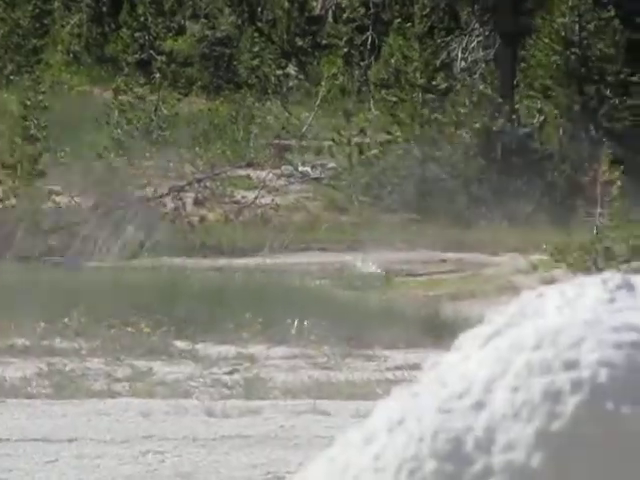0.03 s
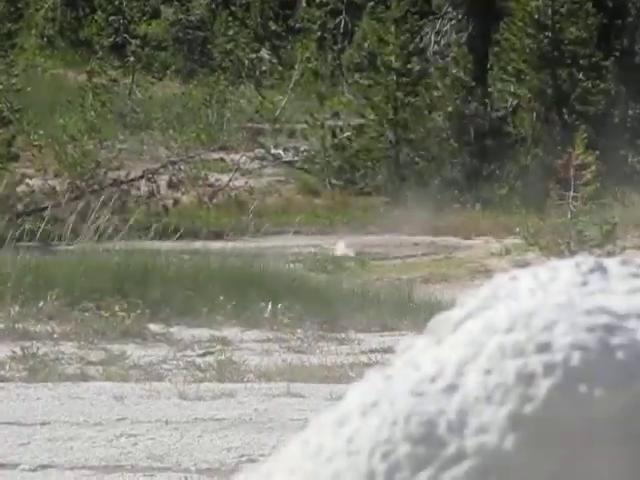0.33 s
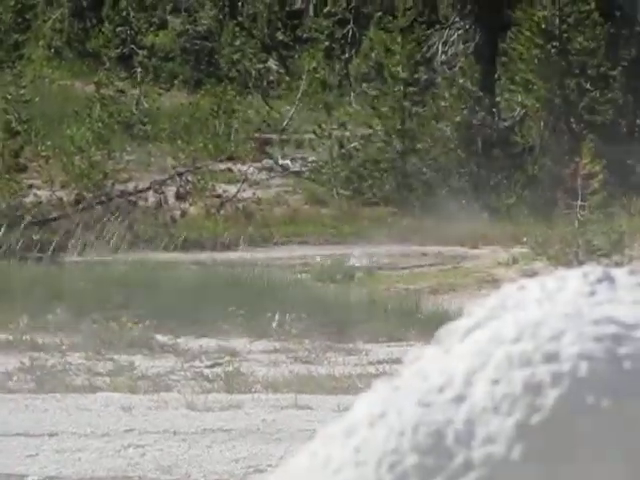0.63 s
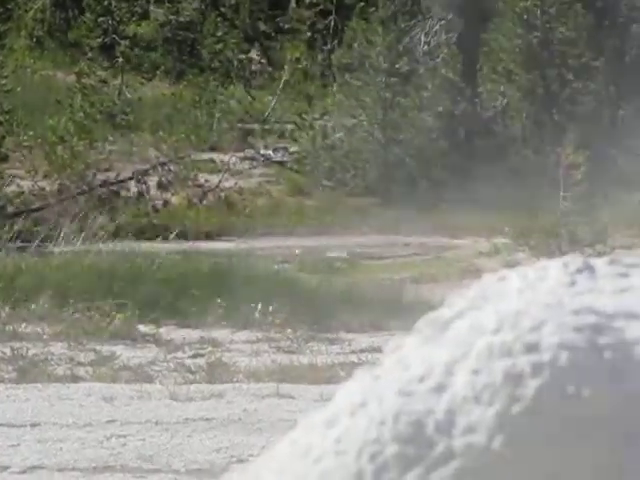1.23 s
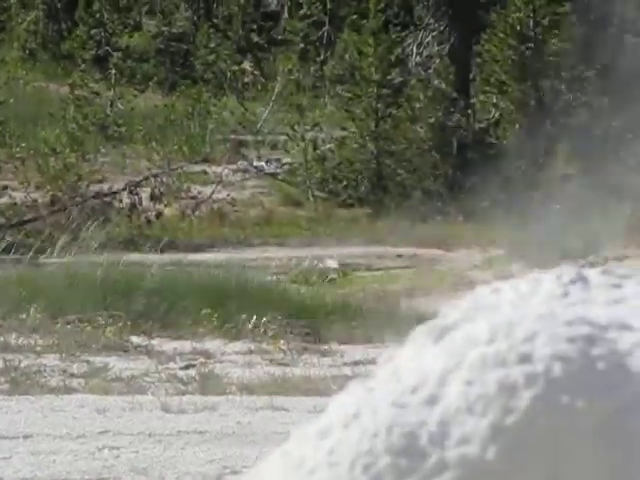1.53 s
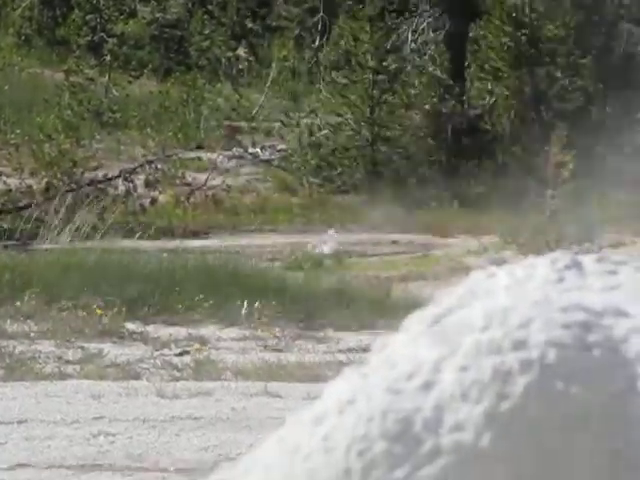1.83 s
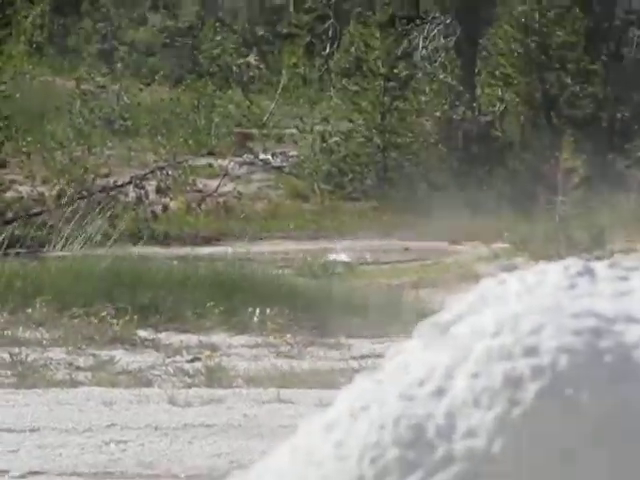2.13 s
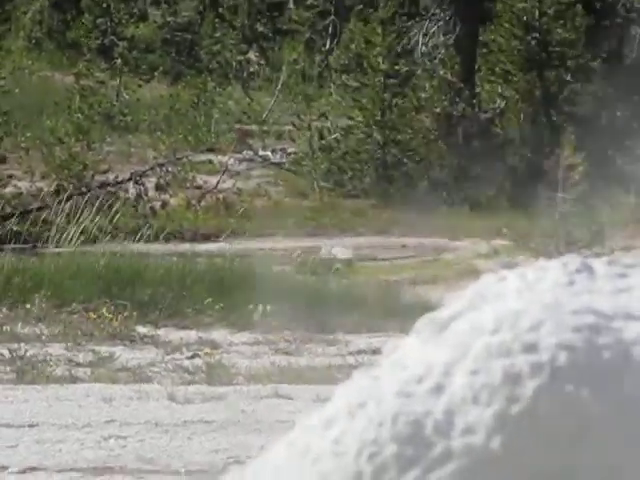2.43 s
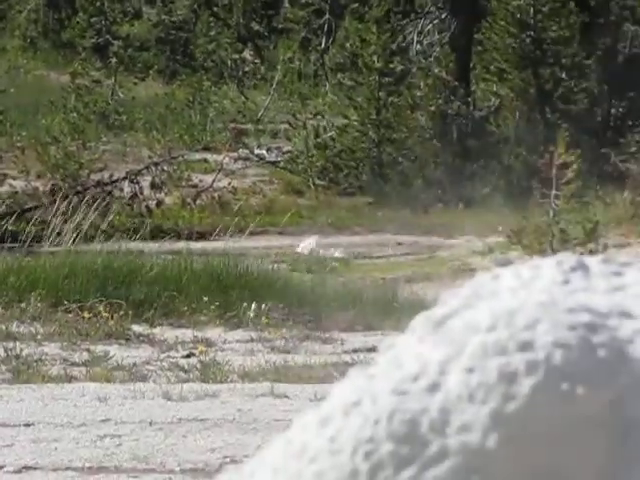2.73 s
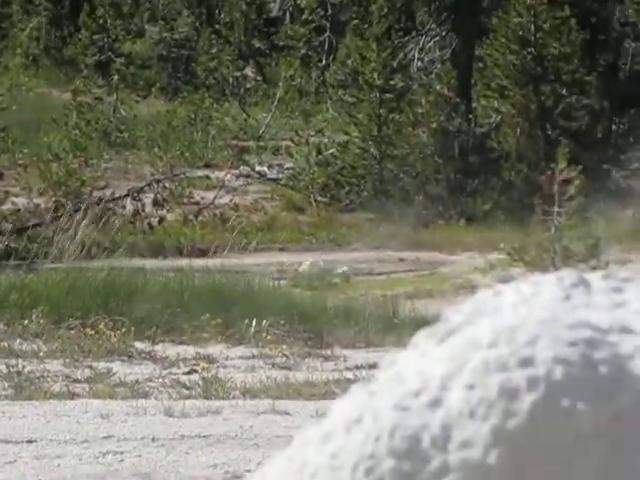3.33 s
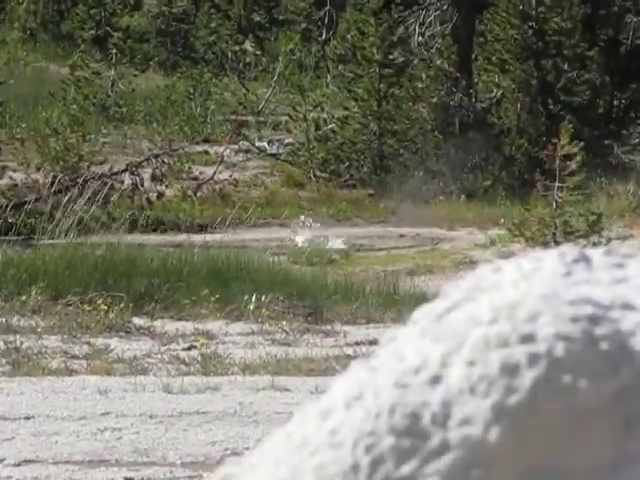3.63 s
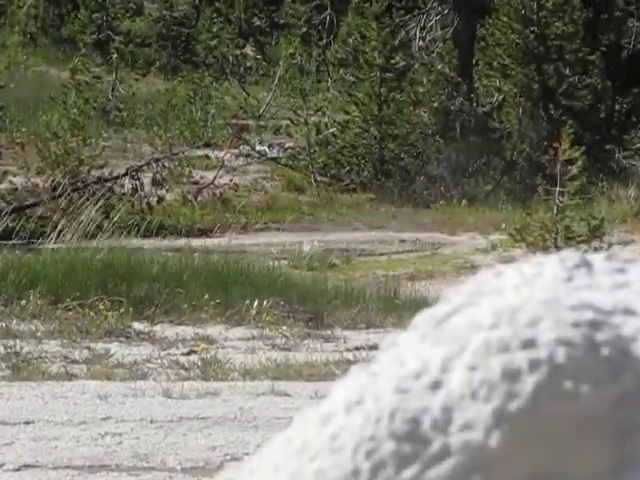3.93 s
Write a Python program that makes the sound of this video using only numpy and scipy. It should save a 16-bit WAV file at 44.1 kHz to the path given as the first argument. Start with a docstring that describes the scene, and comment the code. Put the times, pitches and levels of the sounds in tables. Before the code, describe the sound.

Steam rushes steadily from geyser vents at a forest edge. A gust buffets the microphone with a lumpy low rumble, then drops away, leaving the steam, a few faint water spits and a light breeze in the trees.

```python
"""A steady rush of steam from the vents of a geyser basin at the edge of a forest.
A fine hiss of spray flutters from the right. Hot water thumps softly in a vent and spits now and then,
with a few short, bright pings on top. A gust buffets the two microphone ports with a lumpy
rumble and the knocks of single eddies, then drops while the wind swells in the trees."""
import sys
import numpy as np
from scipy import signal
from scipy.fft import rfft, irfft
from scipy.io import wavfile
from scipy.ndimage import uniform_filter1d

SR = 44100
rng = np.random.default_rng(int(sys.argv[2]) if len(sys.argv) > 2 else 0)


def waveform_to_disk(signal):
    """Save audio, clipped to [-1, 1], as 16-bit WAV at the path in sys.argv[1]."""
    frames = np.transpose(np.atleast_2d(signal))
    scaled = np.clip(frames, -1, 1) * 32767
    samples = np.round(scaled).astype(np.int16)
    wavfile.write(sys.argv[1], SR, samples)


N = 176400
T = np.arange(N) / SR

# Tone of the wind in the trees. Each row: frequency in Hz, relative level in dB.
TREES_TONE = [(300, -20), (1200, 7.5), (3200, -3.5), (5000, -10.5), (7500, -17), (10000, -28.5),
              (15000, -42)]
# Its swell. Each row: time in seconds, level in dB.
TREES_FADER = [(0, -76), (2.2, -61), (2.9, -50.5), (3.3, -47), (3.7, -44), (4, -43.5)]
# Tone of the spray. Each row: frequency in Hz, relative level in dB.
SPRAY_TONE = [(1000, -24), (3200, 0.5), (5000, -1), (7500, -5), (10000, -14), (15000, -25)]
# Its surges and fade. Each row: time in seconds, level in dB.
SPRAY_FADER = [(0, -59.5), (.22, -55.5), (.38, -59.5), (.6, -60), (.85, -59), (1.15, -56.5), (1.32, -60),
               (1.42, -56.5), (1.55, -59.5), (1.74, -56.5), (1.9, -62.5), (2.2, -58.5), (2.7, -66),
               (4, -71)]

# Short bright pings. Each row: peak time in seconds, pitch in Hz, half length in seconds,
# peak level in dB, left minus right in dB.
PING_CUES = [(.6778, 2780, .0019, -30.5, -10), (.677, 7250, .0008, -44, -6), (2.395, 3350, .005, -40, -3),
             (2.456, 3400, .004, -43, -3), (3.565, 3350, .004, -38, -3)]
# Thumps in the vent. Each row: peak time in seconds, pitch in Hz, half length in seconds, peak in dB.
VENT_THUMPS = [(3.062, 178, 0.0029, -26), (3.819, 190, 0.005, -27.5)]
# Spits of water. Each row: peak time in seconds, half length in seconds, level in dB, centre in Hz.
SPIT_CUES = [(.21, .012, -57.5, 5500), (0.453, 0.0095, -36.5, 1100), (0.608, .012, -50, 3000),
             (2.0, .008, -59, 5500), (2.2, .008, -59, 5500), (2.391, 0.011, -39, 1590),
             (3.141, 0.0026, -30.5, 750), (3.145, .005, -41, 1900), (3.367, 0.014, -60, 6000),
             (3.527, .005, -56, 5000), (3.568, 0.0085, -38.5, 1590)]
# Tone of one spit. Each row: multiple of its centre frequency, relative level in dB.
SPIT_TONE = [(.2, -40), (.6, 0.5), (1, 5), (1.7, -7.5), (3, -28.5), (8, -50)]

# The gust's ride. Each row: time in seconds, level at the left port in dB, at the right port in dB.
GUST_FADER = [(0, -20.5, -33), (.1, -25.5, -28), (.2, -19.5, -20.5), (.34, -23.5, -27), (.48, -17, -19.5),
              (.55, -24.5, -23), (.68, -19.5, -30.5), (.77, -17, -24), (.85, -24, -25), (.97, -18, -21.5),
              (1.17, -13, -22), (1.25, -21, -23), (1.38, -21.5, -23.5), (1.45, -25.5, -22),
              (1.54, -28, -25), (1.72, -24, -25.5), (1.88, -30, -39), (2.02, -29.5, -32), (2.1, -35.5, -34),
              (2.18, -40, -44), (2.35, -48, -39), (2.47, -31.5, -39), (2.68, -45, -38.5), (2.8, -49, -38),
              (3.08, -51, -54), (3.35, -55, -46), (4, -53, -62)]
# Tone of its rumble. Each row: frequency in Hz, relative level in dB on the left, then on the right.
GUST_TONE = [(5, -26, -35), (15, -13, 4.5), (28.2, -6, 4.5), (50, 3, 6), (79.6, 0.5, -0.5), (130, -4.5, -6),
             (190, -13.5, -14), (285, -17.5, -20.5), (403, -30, -37.5), (700, -47, -44), (2000, -91, -85)]
# Eddies that strike a port. Each row: peak time in seconds, half length in seconds, level in dB,
# port (0 left, 1 right), centre in Hz.
EDDY_HITS = [(.034, 0.017, -15, 0, 102), (0.059, 0.01, -19, 0, 107), (.22, 0.04, -18.5, 0, 65),
             (.4, 0.009, -14.5, 0, 50), (.44, 0.012, -15, 0, 80), (.475, 0.026, -15.5, 1, 55),
             (.51, 0.0062, -19, 0, 55.5), (.592, 0.021, -17, 1, 45), (0.701, 0.012, -16.5, 0, 70),
             (0.902, 0.0064, -10.5, 0, 95), (0.928, .014, -20.5, 0, 202), (1.005, .014, -20, 1, 75),
             (1.009, 0.015, -14.5, 0, 118), (1.073, 0.0069, -15, 1, 55), (1.123, 0.018, -9.5, 0, 85),
             (1.194, 0.0091, -9.5, 0, 113), (1.23, 0.0064, -10.5, 1, 70), (1.294, 0.0061, -8.5, 0, 86),
             (1.385, 0.0093, -18, 1, 54.5), (1.601, 0.012, -14, 1, 45), (1.647, .011, -12.5, 0, 102),
             (2.405, 0.013, -28.5, 0, 45), (2.965, 0.012, -32, 1, 69.6), (3.16, 0.036, -34.5, 1, 68.6)]
# Tone of one eddy. Each row: multiple of its centre frequency, relative level in dB.
EDDY_TONE = [(.1, -30), (.55, -1.5), (1, -2.5), (1.5, -9.5), (2.6, -18.5), (4, -33.5), (8, -52), (25, -92)]

# Tone of the steam. Each row: frequency in Hz, relative level in dB.
STEAM_TONE = [(20, 1), (70, 3), (140, 3), (230, 2.5), (340, 1), (500, -1.5), (680, 2), (950, -1.5),
              (1400, -3), (1800, -6.5), (2500, -13), (3100, -15.5), (4200, -27), (6000, -34.5),
              (8000, -34.5), (15000, -45.5)]
# Its width, narrow lows to wide highs. Each row: frequency in Hz, left-right correlation.
STEAM_LIKENESS = [(30, 0.79), (190, 1), (700, .92), (1150, 0.74), (1650, 0.69), (2100, 0.42),
                  (2600, -0.0069), (3300, 0.37), (4500, 0.033), (15000, -0.037)]
# Its lean. Each row: frequency in Hz, left minus right in dB.
STEAM_BALANCE = [(100, -1.5), (700, -0.5), (1400, -1.5), (2700, -3), (4500, 4), (8000, 0)]


def amp(db):
    """Decibels to gain."""
    return 10 ** (np.asarray(db) / 20)


def unit(x):
    """Scales to rms 1."""
    return x / np.sqrt(np.mean(x ** 2) + 1e-20)


def at_hz(points, hz):
    """Reads a table on a log-frequency axis."""
    f, value = np.transpose(points)
    return np.interp(np.log(hz + 1), np.log(f + 1), value)


def at_time(points):
    """Reads a fader table at every sample."""
    return np.interp(T, *np.transpose(points))


def colour(x, tone):
    """Equalises a signal with a tone curve."""
    return irfft(rfft(x) * amp(at_hz(tone, np.fft.rfftfreq(N, 1 / SR))), N)


def wander(rate_hz):
    """A smooth random wobble of rms 1."""
    lowpass = np.exp(-(np.fft.rfftfreq(N, 1 / SR) / rate_hz) ** 2)
    return unit(irfft(rfft(rng.standard_normal(N)) * lowpass, N))


def rumble(tone):
    """Coloured noise, held near rms 1 from moment to moment."""
    noise = colour(rng.standard_normal(N), tone)
    power = uniform_filter1d(uniform_filter1d(unit(noise) ** 2, size=1100), size=700)
    return noise / np.sqrt(power + 1e-6) / np.std(noise)


def turbulence(tone, likeness, balance, left_lag_s, patchy_db, flicker_db, size=1024):
    """A stereo noise bed of rms 1, with drifting patches and a flicker shared by all bands."""
    frames, hz = N // (size // 4) + 5, np.fft.rfftfreq(size, 1 / SR)
    left_re, left_im, side_re, side_im, patches = rng.standard_normal((5, frames, len(hz)))
    patches = unit(uniform_filter1d(uniform_filter1d(patches, size=8, axis=0), size=16, axis=1))
    flicker = unit(uniform_filter1d(rng.standard_normal(frames), size=4))[:, None]
    shared = np.clip(at_hz(likeness, hz), -1, 1)
    lean = amp(at_hz(balance, hz) / 2)
    left = left_re + 1j * left_im
    right = shared * left + np.sqrt(1 - shared ** 2) * (side_re + 1j * side_im)
    bands = np.array([left * lean * np.exp(-2j * np.pi * hz * left_lag_s), right / lean])
    bands *= amp(at_hz(tone, hz) + patchy_db * patches + flicker_db * flicker)
    _, bed = signal.istft(bands.transpose(0, 2, 1), nperseg=size, noverlap=size - size // 4)
    return unit(bed[:, :N])


def blip(peak_s, hz, half_s, db, rise_per_s=8):
    """A brief tone whose pitch rises as it rings."""
    t = np.clip(T - peak_s, -5 * half_s, 5 * half_s)
    return amp(db) * np.exp(-(t / half_s) ** 2) * np.sin(2 * np.pi * hz * (t + rise_per_s * t ** 2 / 2))


def burst(peak_s, half_s, db):
    """A bell-shaped envelope."""
    return amp(db) * np.exp(-((T - peak_s) / half_s) ** 2 / 2)


def trees():
    """Wind swells in the needles, an airy wash."""
    wash = turbulence(TREES_TONE, likeness=[(1000, 1.0), (5000, 0.62)],
                      balance=[(2500, -1.3), (6000, 0.52)],
                      left_lag_s=-9.7e-5, patchy_db=1.5, flicker_db=-0.5)
    return amp(at_time(TREES_FADER)) * wash


def spray(droplets_per_s=120, droplets_db=-7):
    """Spray hisses and flutters, with a sprinkle of tiny droplets ticking through it."""
    hiss = turbulence(SPRAY_TONE, likeness=[(3000, 0.98), (12000, 0.61)],
                      balance=[(3000, -1.5), (8000, 1.6)],
                      left_lag_s=4.2e-5, patchy_db=1.4, flicker_db=1.35)
    hits = rng.random((2, N)) < droplets_per_s / SR
    strength = amp(5.8 * np.minimum(rng.exponential(1, (2, N)), 4))
    polarity = rng.choice([-1, 1], (2, N))
    droplets = unit(colour(hits * strength * polarity, SPRAY_TONE))
    return amp(at_time(SPRAY_FADER)) * (hiss + amp(droplets_db) * droplets)


def pings(left_lag_s=0.00019):
    """Short bright pings: one plink from the right, then faint 3.4 kHz rings around the spits."""
    out = np.zeros((2, N))
    for peak_s, hz, half_s, db, pan_db in PING_CUES:
        out[0] += blip(peak_s + left_lag_s, hz, half_s, db + pan_db / 2)
        out[1] += blip(peak_s, hz, half_s, db - pan_db / 2)
    return out


def thumps():
    """Boiling water thumps in the vent: soft, low and dead centre."""
    return sum(blip(*row) for row in VENT_THUMPS)


def spits(crossfeed=0.37, balance_db=-1):
    """Short bursts of fizz where boiling water breaks the surface."""
    out = np.zeros((2, N))
    for peak_s, half_s, db, hz in SPIT_CUES:
        tone = [(ratio * hz, level) for ratio, level in SPIT_TONE]
        fizz = unit(colour(rng.standard_normal((2, N)), tone))
        out += burst(peak_s, half_s, db) * unit(fizz + crossfeed * fizz[::-1])
    return out * amp([[balance_db / 2], [-balance_db / 2]])


def buffeting(port, lumps_db=2.4, lumps_hz=21.5):
    """The gust's lumpy rumble at one port, and the knocks of the eddies that strike it."""
    fader_db = at_time([(row[0], row[1 + port]) for row in GUST_FADER])
    fader_db += lumps_db * wander(lumps_hz)
    out = amp(fader_db) * rumble([(row[0], row[1 + port]) for row in GUST_TONE])
    for peak_s, half_s, db, struck_port, hz in EDDY_HITS:
        if round(struck_port) == port:
            swirl = rumble([(ratio * hz, level) for ratio, level in EDDY_TONE])
            out += burst(peak_s, half_s, db) * swirl
    return out


def steam(start_db=-36, swell_db_per_s=0.25):
    """Steam pours from the vents in a broad, steady rush that creeps up in level."""
    rush = turbulence(STEAM_TONE, STEAM_LIKENESS, STEAM_BALANCE,
                      left_lag_s=0, patchy_db=0.56, flicker_db=0.22)
    return amp(start_db + swell_db_per_s * T) * rush


def scene():
    """The stereo mix of wind, steam, water and pings."""
    gust = np.array([buffeting(port) for port in range(2)])
    return gust + steam() + spray() + trees() + spits() + thumps() + pings()


def record(dry, cutoff_hz=15400):
    """A steep low-pass takes the very top off the mix."""
    lowpass = signal.firwin(511, cutoff_hz, window=("kaiser", 9), fs=SR)
    return signal.oaconvolve(dry, lowpass[None], "same")


dry = scene()
out = record(dry)
waveform_to_disk(out)
```